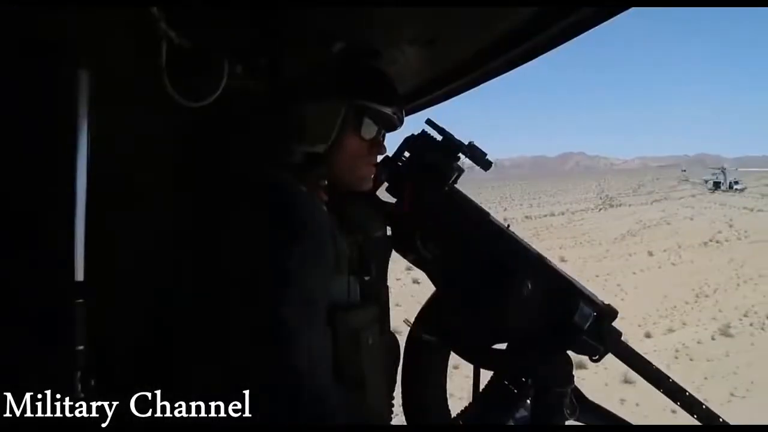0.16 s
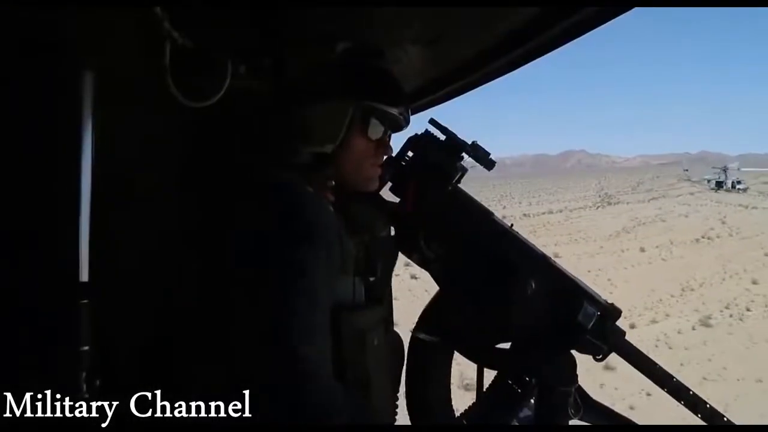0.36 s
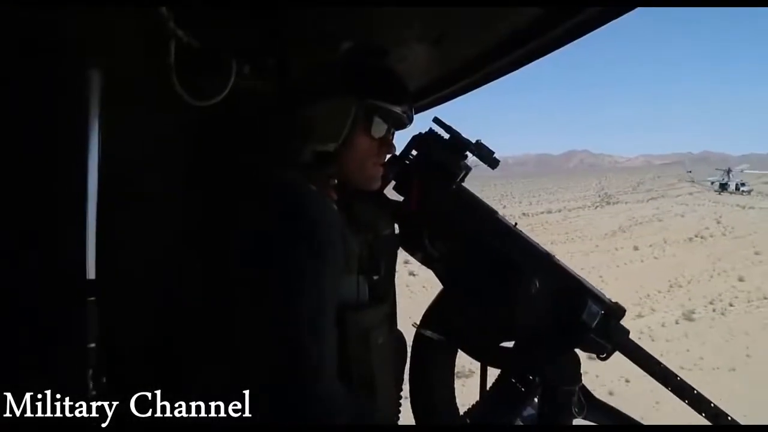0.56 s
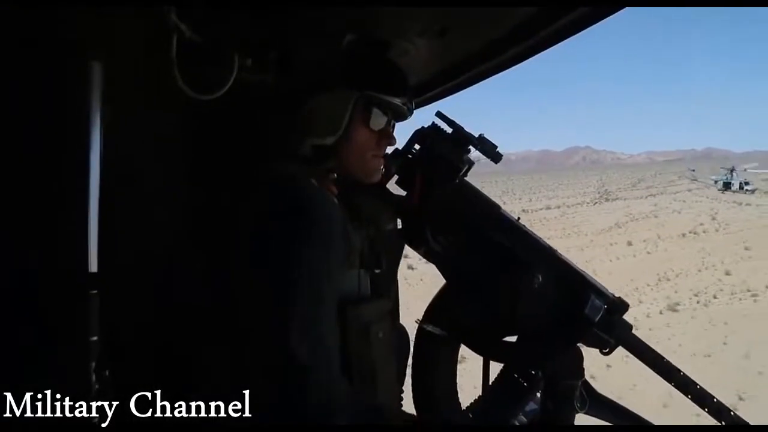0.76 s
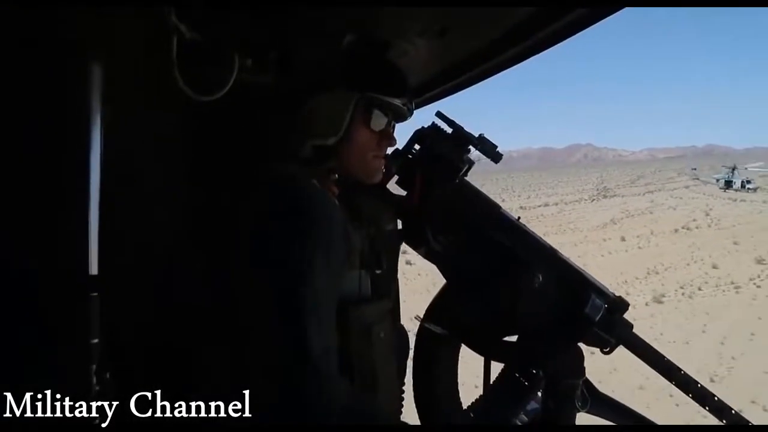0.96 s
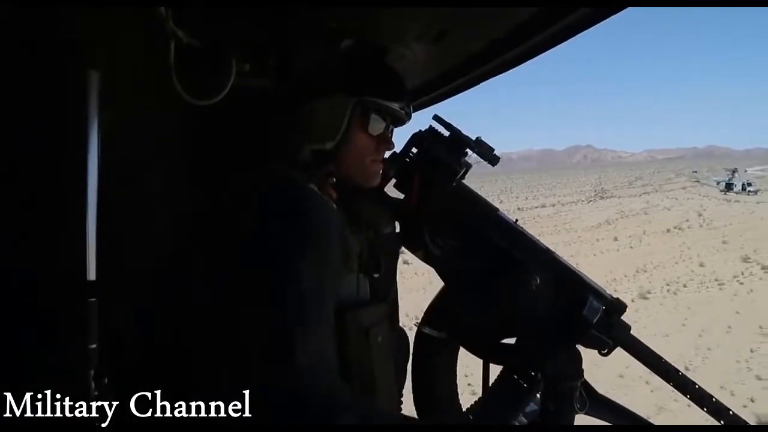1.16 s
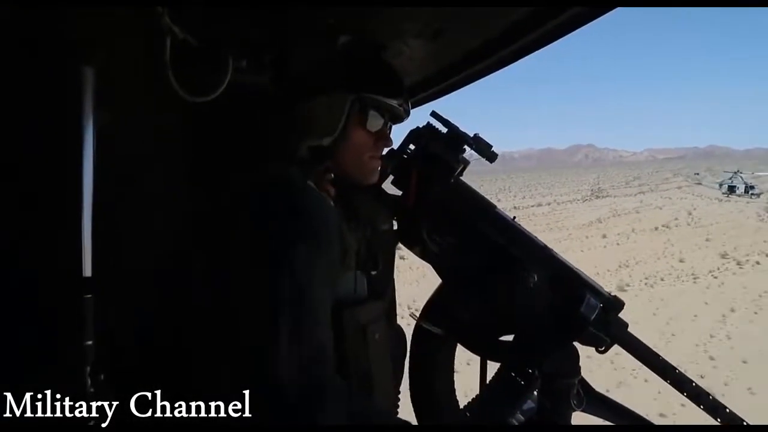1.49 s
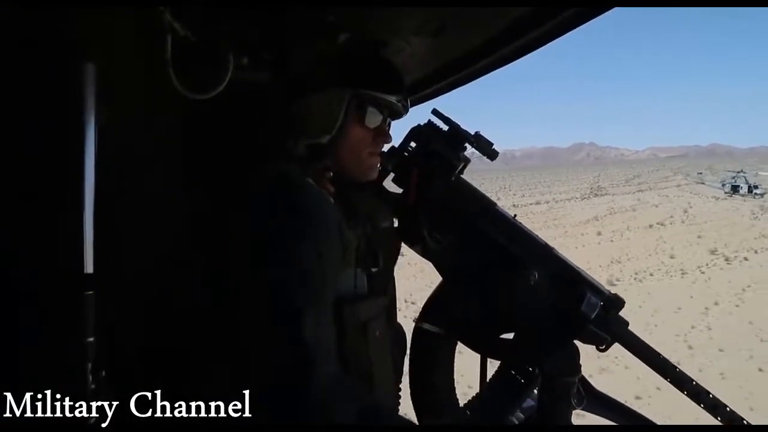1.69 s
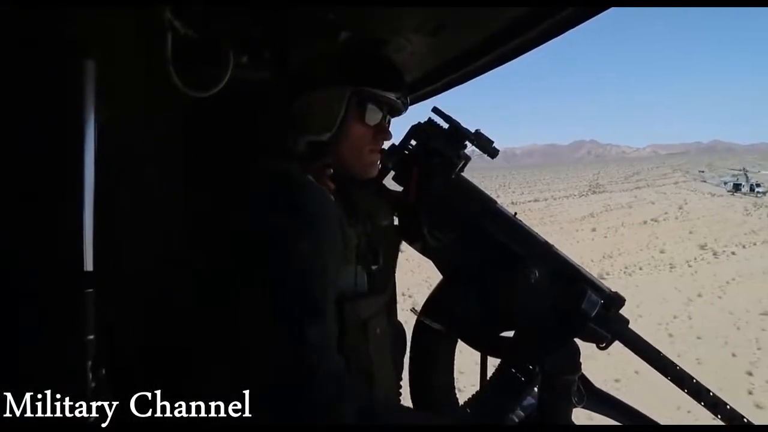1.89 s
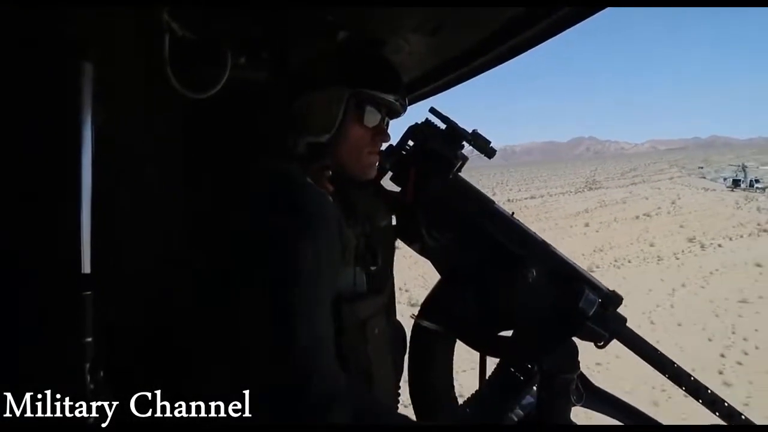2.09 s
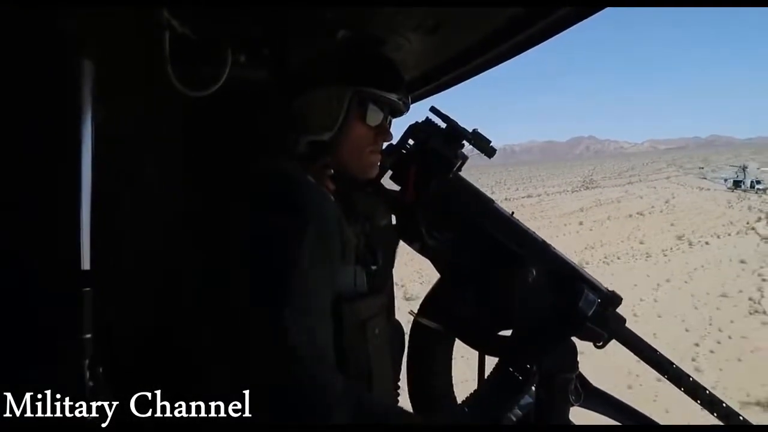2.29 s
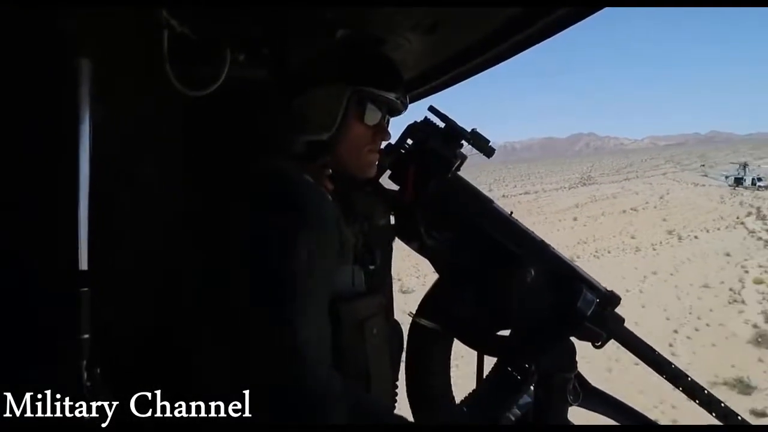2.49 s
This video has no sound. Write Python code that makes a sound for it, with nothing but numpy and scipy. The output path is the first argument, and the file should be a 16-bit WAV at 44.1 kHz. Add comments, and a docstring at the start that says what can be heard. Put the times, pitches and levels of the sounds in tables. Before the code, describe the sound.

Steady helicopter cabin roar with a two-pitched gear whine, chopped by ragged wind overload on the microphone

```python
"""Gearbox and turbine whine inside a flying helicopter, door open, over a roar of rushing air.
The whines are sines locked to one shaft speed; the roar is shaped noise.
Rotor downwash and slipstream buffets overload the microphone capsule, choking the cabin sound
for a few milliseconds at a time: a ragged, crackling flutter. A faint treble hiss differs left to right."""
import sys
import numpy as np
from scipy import signal
from scipy.fft import rfft, irfft
from scipy.io import wavfile
from scipy.ndimage import uniform_filter1d

SR = 44100
rng = np.random.default_rng(int(sys.argv[2]) if len(sys.argv) > 2 else 0)


def master_out(mix):
    """Clip the mix to full scale and print it as 16-bit PCM to the path in sys.argv[1]."""
    frames = np.transpose(np.atleast_2d(mix))
    ceiling = np.clip(frames, -1, 1)
    pcm = np.round(ceiling * 32767).astype(np.int16)
    wavfile.write(sys.argv[1], SR, pcm)


N = 116865


def undb(db):
    """Decibels to amplitude gain."""
    return 10 ** (np.asarray(db) / 20)


def colour(x, points):
    """Filter by a gain curve, dB linear in log frequency between its points."""
    hz, db = np.array(points).T
    f_hz = np.maximum(np.fft.rfftfreq(N, 1 / SR), 1)
    gain = undb(np.interp(np.log(f_hz), np.log(hz), db))
    return irfft(rfft(x) * gain, N)


def noise(points, rms_db):
    """Gaussian noise of a given spectral shape, scaled to an rms level."""
    x = colour(rng.standard_normal(N), points)
    return x / x.std() * undb(rms_db)


def walk(rate_per_s):
    """Smooth random drift, mean 0, spread 1: held random steps, averaged twice over one step."""
    step = int(SR / rate_per_s)
    held = rng.standard_normal(N)[np.arange(N) // step]
    x = uniform_filter1d(uniform_filter1d(held, step), step)
    return (x - x.mean()) / x.std()


# cabin air and machinery spectrum, shape only: [f/Hz, level/dB per Hz]
ROAR_SPECTRUM = [(60, 5.5), (130, 5), (350, 0.5), (520, -4.5), (700, -3), (900, -6), (1250, -4), (1600, -7),
                 (2500, -8.5), (3350, -13.5), (3700, -14), (4100, -18.5), (4900, -26), (6000, -56.5),
                 (8000, -35), (15000, -36)]
ROAR_RMS_DB = -6.5  # re capsule overload limit


def roar():
    """Rushing air and machinery: broadband noise, steady in level."""
    return noise(ROAR_SPECTRUM, ROAR_RMS_DB)


BLADE_HZ, BLADE_AT_S = 17.78, 0.021  # passing rate, time of one peak
BLADE_PUSH, BLADE_SHARPNESS = .7, 3.7  # peak in overload limits; higher sharpness = narrower pulse


def downwash(t):
    """One smooth pressure pulse for each passing rotor blade."""
    phase = 2 * np.pi * BLADE_HZ * (t - BLADE_AT_S)
    return BLADE_PUSH * np.exp(BLADE_SHARPNESS * (np.cos(phase) - 1))


# open-door turbulence spectrum, shape only: [f/Hz, level/dB per Hz]
TURBULENCE_SPECTRUM = [(15, -26), (28, -10.5), (42, 3), (65, -8.5), (100, -7.5), (200, -27.5), (500, -59)]
TURBULENCE_RMS_DB = -4.5  # re overload limit
# strongest air buffets on the microphone: [centre t/s, width at half height/ms, pressure/overload limits]
AIR_BUFFETS = [(.010, 7.4, 2.54), (.107, 5.6, 3), (.120, 10.5, 2.23), (.146, 3.8, 2.3), (.185, 10.3, 2.2),
               (.222, 3.2, 2.7), (.234, 14, 2.43), (.259, 8.3, 2.4), (.266, 9.1, 2.56), (.324, 5, 1.9),
               (.489, 5.7, 1.9), (.527, 14.3, 2.34), (.573, 5, 2.3), (.586, 1.9, 3.8), (.624, 6.8, 2.14),
               (.684, 7.4, 2.9), (.710, 6.2, 2.8), (.768, 4, 4.8), (.787, 6.8, 1.74), (.852, 3.4, 2.6),
               (.867, 5.4, 4), (.917, 6.5, 1.2), (.930, 9, 3.03), (.966, 7.6, 1.9), (.977, 4, 1.6),
               (1.036, 14.6, 2.24), (1.054, 7.9, 3), (1.080, 3.8, 1.9), (1.098, 14, 2.52), (1.184, 6, 2.5),
               (1.198, 12, 2.8), (1.2095, 10.5, 3.2), (1.218, 4.1, 3.9), (1.320, 4.6, 2.1),
               (1.389, 21, 1.25), (1.490, 7.8, 3), (1.500, 8, 1.8), (1.514, 6.2, 2.2), (1.527, 8, 4),
               (1.537, 4.6, 4.1), (1.550, 6.1, 3.4), (1.572, 7.6, 1.6), (1.584, 6, 2.9), (1.598, 4.4, 3),
               (1.620, 6.9, 2), (1.689, 3.5, 2.5), (1.789, 4, 2.9), (1.829, 3.1, 3.6), (1.864, 7.9, 3),
               (1.879, 2.2, 1.1), (1.899, 3.7, 3.1), (1.979, 4.2, 3), (1.995, 7.2, 3), (2.007, 2.7, 3.2),
               (2.033, 7.1, 1.9), (2.060, 4, 2.9), (2.108, 3.1, 2.2), (2.161, 8.9, 2.4), (2.206, 9.8, 1.9),
               (2.222, 7.7, 2.5), (2.235, 8, 2), (2.246, 5.7, 3.6), (2.257, 3.6, 3.6), (2.274, 12, 1.9),
               (2.283, 11, 2.1), (2.294, 7.6, 2.3), (2.304, 8.6, 3), (2.316, 9.8, 4.9), (2.3295, 8.8, 2.5),
               (2.342, 5.9, 3.4), (2.355, 5.4, 2.5), (2.423, 5.4, 2.1), (2.443, 5.4, 3.4),
               (2.484, 5.8, 2.1), (2.526, 4.7, 2.7), (2.542, 15.5, 1.6), (2.617, 5.7, 1.5)]


def wind(t):
    """Turbulence and downwash pressure, swept aside by buffets that push and pull in turn."""
    pressure = noise(TURBULENCE_SPECTRUM, TURBULENCE_RMS_DB) + downwash(t)
    for k, (at_s, width_ms, size) in enumerate(AIR_BUFFETS):
        half_width_s = width_ms / 2000
        bump = np.exp(-np.log(2) * np.abs((t - at_s) / half_width_s) ** 3)
        sign = (-1) ** k
        pressure = pressure * (1 - bump) + sign * size * bump
    return pressure


# three gearbox meshes (third = octave of second), turbine whistle: [f/Hz at mean shaft speed]
TONE_HZ = (678.3, 1271.3, 2542.6, 3671)
# same four tones, before swell and flutter: [rms level/dB re overload limit]
TONE_RMS_DB = (-13, -14, -35.5, -23.5)
# slow whine swells: [t/s, lower gear level/dB, upper gear level/dB, turbine level/dB]
WHINE_SWELLS = [(0, 0.5, 3, -3), (.3, 0, 2, 2), (.75, -2.5, -1.5, 0.5), (1.05, 0, 0.5, 5),
                (1.4, -0.5, -0.5, 0.5), (1.72, -0.5, -3.5, 0.5), (2.1, 0.5, 0, 4), (2.65, 0, -3.5, 1.5)]
SAG_PER_S, WAVER, WAVER_PER_S = .0026, .0008, 14  # speed fraction per s, rms speed fraction, steps per s
FLUTTER_RMS_DB, FLUTTER_PER_S = 2.26, 40


def whines(t):
    """Gear and turbine sines follow one slowly sagging shaft speed; each swells and flutters in moving air."""
    speed = 1 - SAG_PER_S * (t - t.mean()) + WAVER * walk(WAVER_PER_S)
    turn = 2 * np.pi * np.cumsum(speed) / SR  # rad per Hz of tone
    at_s, *curves = np.array(WHINE_SWELLS).T
    lower, upper, turbine = (np.interp(t, at_s, curve) for curve in curves)
    total = np.zeros(N)
    for hz, rms_db, swell_db in zip(TONE_HZ, TONE_RMS_DB, (lower, upper, upper, turbine)):
        flutter_db = FLUTTER_RMS_DB * walk(FLUTTER_PER_S)
        peak = np.sqrt(2) * undb(rms_db + swell_db + flutter_db)
        start_phase = 2 * np.pi * rng.random()
        total += peak * np.sin(hz * turn + start_phase)
    return total


def scene():
    """Roar, wind pressure and whines sum at one point, alike in both channels."""
    t = np.arange(N) / SR
    air = roar() + wind(t) + whines(t)
    return np.array([air, air])


LIMIT_DB, KNEE, LEAK = -15.5, 2.88, 0.014  # limit level, overload hardness, fraction leaking past it


def capsule(dry):
    """Overload: gain falls as pressure nears the limit; returns the held signal and that gain."""
    give = (1 + np.abs(dry) ** KNEE) ** (-1 / KNEE)
    return undb(LIMIT_DB) * dry * (give + LEAK), give


LOW_CUT_HZ, LOW_CUT_Q = 90, 0.67


def low_cut(x):
    """Second-order high-pass weakens the wind's slow push."""
    w = 2 * np.pi * LOW_CUT_HZ
    b, a = signal.bilinear([1, 0, 0], [1, w / LOW_CUT_Q, w * w], SR)
    return signal.lfilter(b, a, x)


# antiphase hiss spectrum, shape only: [f/Hz, level/dB per Hz]
SPREAD_SPECTRUM = [(1180, -84), (2000, -54), (3580, -53), (3700, -26), (4310, -9), (5590, 5), (8600, -0.5),
                   (13900, -1), (15000, 2)]
SPREAD_RMS_DB = -54.8  # before ducking


def spread_hiss(give):
    """Treble hiss of opposite sign left and right, ducked by the capsule's smoothed gain."""
    duck = uniform_filter1d(give, size=64)
    return noise(SPREAD_SPECTRUM, SPREAD_RMS_DB) * duck * np.array([[1], [-1]])


# microphone response: [f/Hz, level/dB]
MIC_RESPONSE = [(30, -10.5), (100, -6), (400, 1.5), (1500, 0), (4000, 0.5), (6000, 7), (8000, 3.5),
                (10500, 3), (12500, 2), (14000, 5.5), (15000, -2)]
HISS_RMS_DB = -56.5  # before microphone colour
CEILING, CEILING_KNEE = .21, 6  # full scale = 1; hardness
TOP_HZ = 15000


def record(dry):
    """Capsule overload, low cut, shared hiss, colour, rounded peaks, antiphase hiss, steep top cut."""
    held, give = capsule(dry)
    hiss = undb(HISS_RMS_DB) * rng.standard_normal(N)
    out = colour(low_cut(held) + hiss, MIC_RESPONSE)
    out = out / (1 + np.abs(out / CEILING) ** CEILING_KNEE) ** (1 / CEILING_KNEE)
    top_cut = signal.ellip(8, .2, 70, TOP_HZ, fs=SR, output="sos")  # order, ripple dB, stop dB
    return signal.sosfilt(top_cut, out + spread_hiss(give))


dry = scene()
out = record(dry)
master_out(out)
```